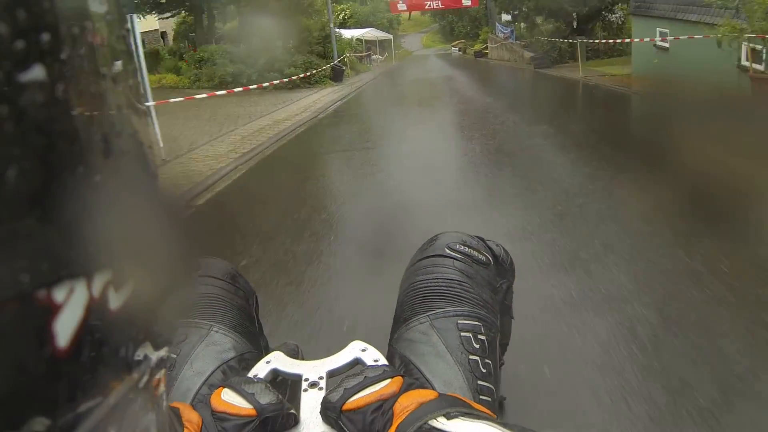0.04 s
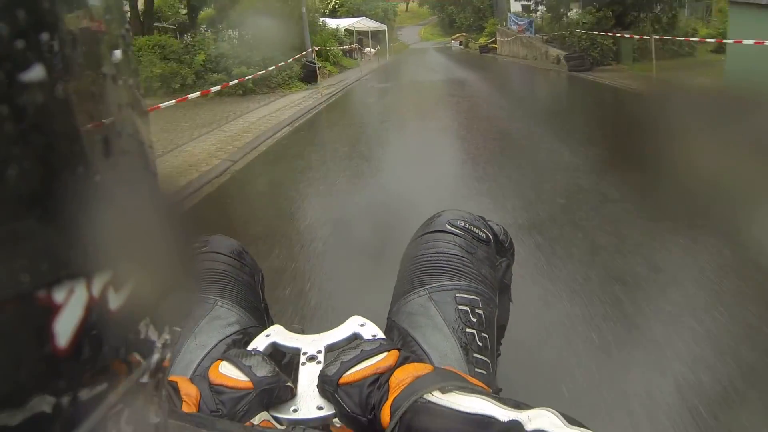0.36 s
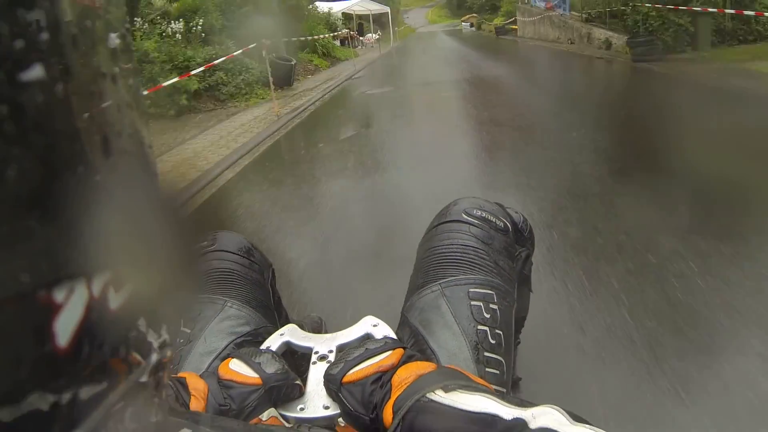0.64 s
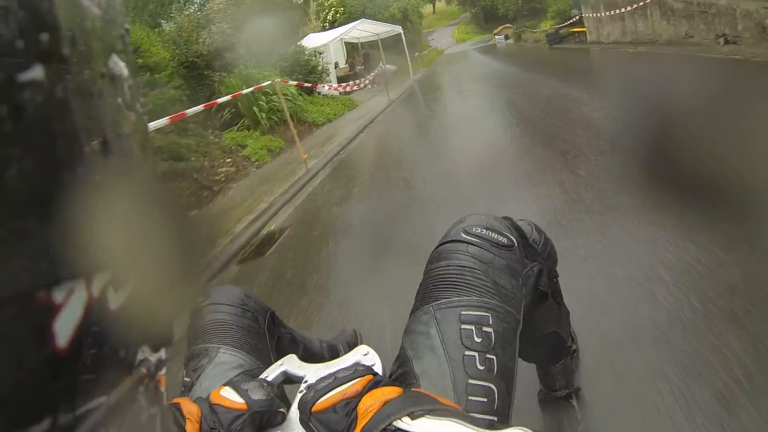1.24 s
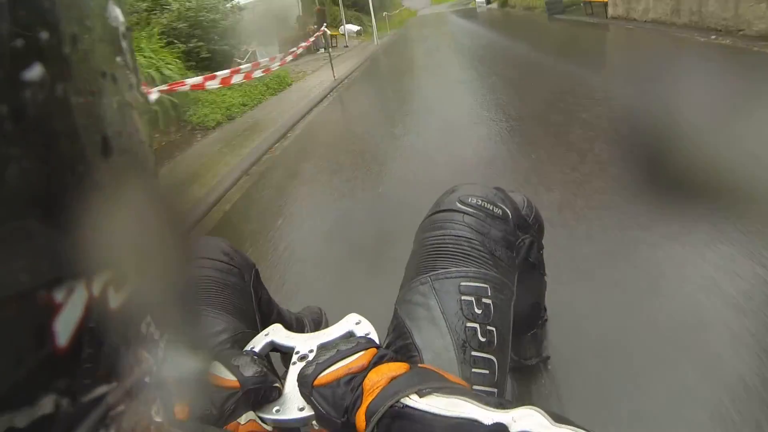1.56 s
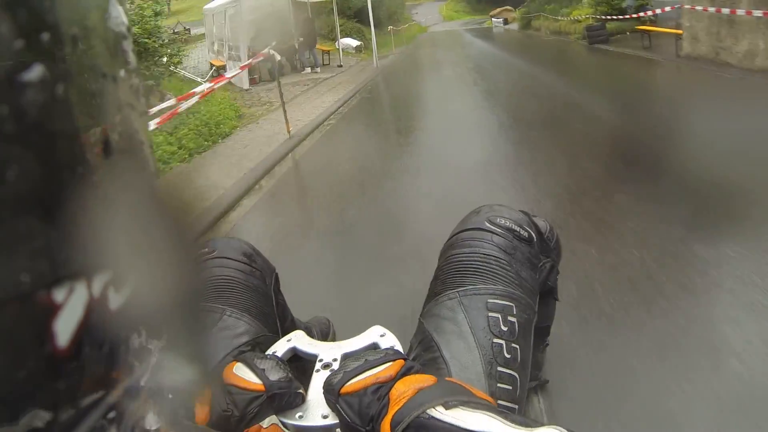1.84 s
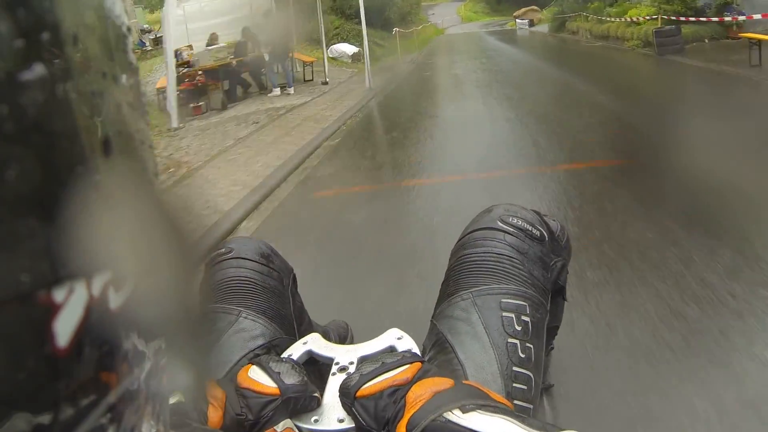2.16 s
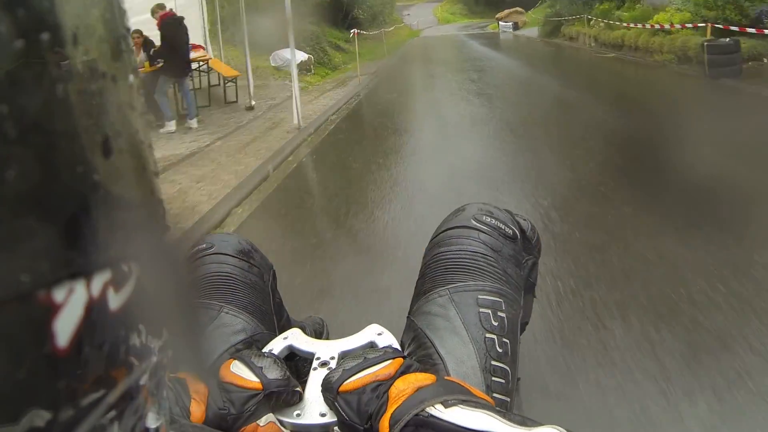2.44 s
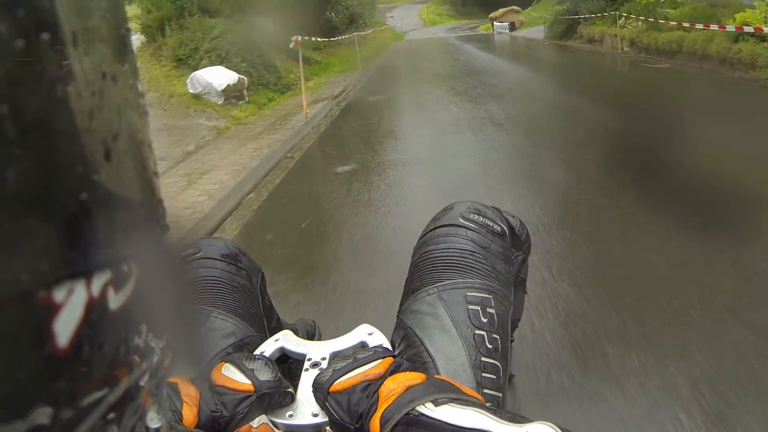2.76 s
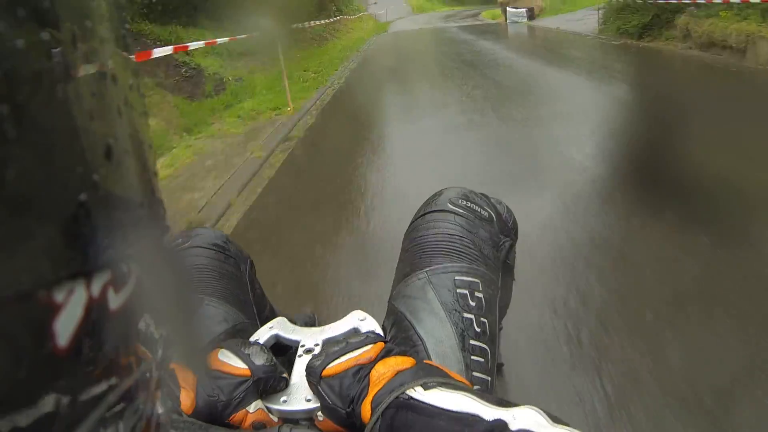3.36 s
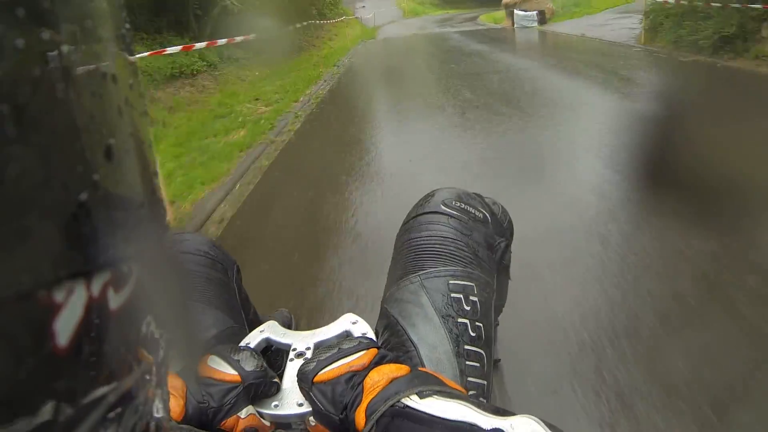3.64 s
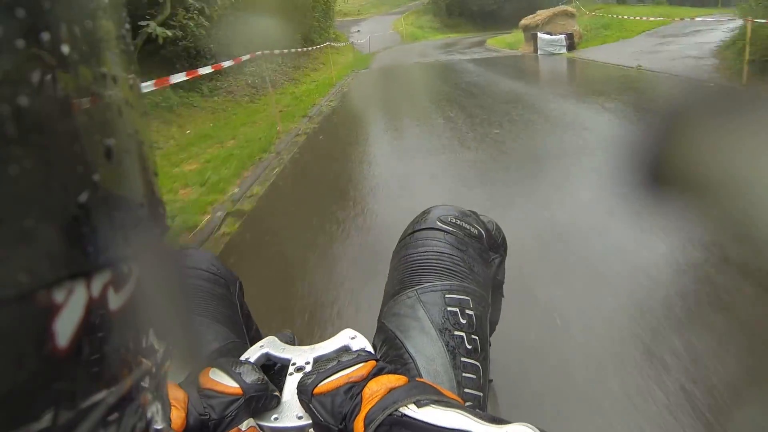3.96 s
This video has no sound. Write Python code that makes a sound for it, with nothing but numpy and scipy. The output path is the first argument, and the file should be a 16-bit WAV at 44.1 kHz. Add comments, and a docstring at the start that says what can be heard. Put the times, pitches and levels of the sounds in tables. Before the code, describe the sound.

A small ride-on car rolls on wet asphalt with a continuous wheel rumble and low shudder, heard from on board. The shudder is steady until about 1 second, weakens, then returns unevenly near 2 seconds, with faint hissing spray. Grit knocks, drops tick and a loose fitting rattles throughout, with one sharper knock around 1.6 seconds. Short gusts hit at 1.2, 3.2 and 3.5 seconds, as the rolling eases slightly.

```python
"""A low shudder and the roar of hard wheels: a small ride-on car coasts down a wet asphalt road.
We listen from a camera fixed to the car. The shudder is the frame bouncing, steadily at first,
then stumbling. The wheels also rumble through the body and throw up a hissing spray.
Grit knocks and water drops tick on the camera housing, a loose fitting rattles,
and three short gusts buffet the microphone."""
import sys
import numpy as np
from scipy import signal
from scipy.fft import rfft, irfft
from scipy.io import wavfile

SR = 44100
rng = np.random.default_rng(int(sys.argv[2]) if len(sys.argv) > 2 else 0)


def master_out(mix):
    """Clip the mix to full scale and print it as 16-bit PCM to the path in sys.argv[1]."""
    frames = np.transpose(np.atleast_2d(mix))
    ceiling = np.clip(frames, -1, 1)
    pcm = np.round(ceiling * 32767).astype(np.int16)
    wavfile.write(sys.argv[1], SR, pcm)


N = 176400
T = np.arange(N) / SR
AGE = T[:4096]  # seconds since a short sound began

# how loudly the wheels roll on the asphalt: t/s, level/dB
ROLLING_LEVEL = [(0.0, -35), (0.79, -36.5), (3.35, -37.5), (3.6, -41.3)]


def from_db(db):
    """Turn decibels into a number to multiply a sound by."""
    return 10 ** (np.asarray(db) / 20)


def rms_one(x):
    """Scale a signal so its average strength (rms) is 1."""
    return x / np.sqrt(np.mean(x ** 2) + 1e-20)


def in_time(rows):
    """Join (time, value) rows by straight lines."""
    return np.interp(T, *np.transpose(rows))


def drift(rate_hz):
    """A smooth random wobble of size about 1; a higher rate wobbles faster."""
    step, warm_up = 40, 2000
    memory = np.exp(-2 * np.pi * rate_hz * step / SR)
    noise = rng.standard_normal(N // step + warm_up + 2)
    slow = signal.lfilter([1], [1, -2 * memory, memory * memory], noise)[warm_up:]
    return np.interp(np.arange(N) / step, np.arange(len(slow)), rms_one(slow))


def coloured(x, colour, resonances=()):
    """Shape the lows and highs by (Hz, dB) points and add ringing peaks; the result has rms 1."""
    hz = np.maximum(np.fft.rfftfreq(N, 1 / SR), 1)
    points_hz, points_db = np.transpose(colour)
    db = np.interp(np.log(hz), np.log(points_hz), points_db)
    for centre, width, gain in resonances:
        db = db + gain / (1 + (2 * (hz - centre) / width) ** 2)
    low_cut = 1 / np.sqrt(1 + (points_hz[0] / hz / 2 ** .5) ** 8)
    high_cut = 1 / np.sqrt(1 + (hz / points_hz[-1] / 2) ** 8)
    return rms_one(irfft(rfft(x) * from_db(db) * low_cut * high_cut, N))


def dying(t60):
    """A fade that starts at 1 and falls by 60 dB in t60 seconds."""
    return np.exp(-np.log(1000) * AGE / t60)


def ring(modes):
    """The fading tones (Hz, dB, t60) of a struck object, a little different on each blow."""
    return sum(from_db(db + rng.normal(0, 0.19)) * np.sin(2 * np.pi * hz * AGE) * dying(t60)
               for hz, db, t60 in modes)


def burst(noise, db, t60):
    """A short piece of noise that fades away."""
    start = rng.integers(N - len(AGE))
    return from_db(db) * noise[start:start + len(AGE)] * dying(t60)


def add(out, s, sound):
    """Mix a sound in at s seconds."""
    i = max(int(s * SR), 0)
    out[i:i + len(sound)] += sound[:max(N - i, 0)]


def wheels():
    """Hard wheels shake the body, roar on the asphalt and throw up a grainy spray."""
    # tone of the road rumble: f/Hz, level/dB
    rumble_colour = [(25, 21.5), (44, 26.5), (65, 2), (160, -7), (300, -12.5), (900, -36)]
    # where the car body rings: f/Hz, width/Hz, boost/dB
    body_peaks = [(89, 1.5, 15.3), (142.4, 28, 6.1), (220, 58, 10.1)]
    # tone of the roar: f/Hz, level/dB
    roar_colour = [(300, -3), (500, 1.5), (740, -7), (1000, 0), (1450, 2), (2800, -9), (3700, -10.5),
                   (5500, -28), (6400, -21), (7500, -38)]
    # where the camera housing rings: f/Hz, width/Hz, boost/dB
    housing_peaks = [(968, 50, 6.2), (1130, 105, 4.5), (1436, 57, 7.4), (5030, 370, 9.7)]
    # loudness of the spray off the tyres: t/s, level/dB
    spray_level = [(0.0, -80), (1.97, -63.5), (4.0, -73)]
    # tone of the spray: f/Hz, level/dB
    spray_colour = [(2500, -30), (6500, -2.5), (8000, -0.5), (9700, 4), (15000, -17)]
    white = rng.standard_normal((3, N))
    rolling_db = in_time(ROLLING_LEVEL)
    rumble_db = -24.5 + 1.7 * (rolling_db - rolling_db.mean()) + 0.5 * drift(17)
    rumble = from_db(rumble_db) * coloured(white[0], rumble_colour, body_peaks)
    roar = from_db(rolling_db + 1.2 * drift(37)) * coloured(white[1], roar_colour, housing_peaks)
    grain = from_db(2.5 * drift(260))
    spray = from_db(in_time(spray_level)) * coloured(white[2] * grain, spray_colour)
    return rumble + roar + spray


def wind():
    """Gusts hit the microphone as short, low puffs of noise."""
    # the peak of each gust: t/s, level/dB
    gusts = [(1.188, -26), (3.203, -20.5), (3.497, -22)]
    width_s = 0.012
    swell = sum(from_db(db) * np.exp(-.5 * ((T - s) / width_s) ** 2) for s, db in gusts)
    return swell * coloured(rng.standard_normal(N), [(65, 0), (140, -14), (900, -38)])


def drops():
    """Water thrown up by the wheels ticks on the housing; finer drops land at random."""
    # the bigger drops: t/s, relative level/dB
    big_drops = [(0.0717, -37), (0.1332, -28.5), (0.5217, -38.5), (0.6777, -35), (0.946, -38),
                 (1.1598, -39), (1.544, -32.5), (2.3175, -39), (2.866, -40.5), (3.1228, -34.5),
                 (3.476, -42.5)]
    # tone of a splash: f/Hz, level/dB
    splash_colour = [(3000, 9.5), (12500, 1), (15500, -18)]
    fine_per_s, fade_s = 24, 0.01
    out = np.zeros(N)
    splash = coloured(rng.standard_normal(N), splash_colour)
    for s, db in big_drops:
        add(out, s, burst(splash, db - 0.5, fade_s))
    for s in T[rng.random(N) < fine_per_s / SR]:
        fine_db = -48 + 3.5 * min(rng.normal(), 2)
        add(out, s, burst(splash, fine_db, fade_s))
    return out


def rattles():
    """A loose fitting taps and scrapes, with faint chatter that is louder when the wheels are."""
    # taps of the fitting: t/s, relative level/dB, f/Hz
    taps = [(.248, -20, 1920), (.2956, -22, 1960), (.34, -29, 1660), (.372, -24.5, 1820),
            (.4685, -16.5, 1994), (.6247, -27.5, 1860), (.865, -22, 1970), (.8715, -19, 1510),
            (.886, -19, 1950), (1.6443, -26.5, 2060), (1.705, -28, 1680), (1.916, -23, 1800),
            (2.475, -24, 1760), (2.6163, -25, 1880), (2.891, -26, 1740), (3.112, -21.5, 1640),
            (3.36, -28, 1660), (3.7999, -26.5, 2430), (3.9468, -21, 1860)]
    # higher tones in every tap: f/Hz, relative level/dB, fade time/s
    upper_tones = [(3060, -8, 0.017), (6250, -23, 0.012)]
    chatter_per_s, rise_s, fade_s = 12, 0.00091, 0.019
    out = np.zeros(N)
    rolling_db = in_time(ROLLING_LEVEL)
    chatter_db = -32.5 + rolling_db - rolling_db.mean()
    scrape = coloured(rng.standard_normal(N), [(1100, -6), (1900, 1), (2600, -23)])
    moments = np.flatnonzero(rng.random(N) < chatter_per_s / SR)
    chatter = [(T[i], chatter_db[i], rng.uniform(1230, 2238)) for i in moments]
    onset = 1 - np.exp(-(AGE / rise_s) ** 2)
    for s, db, hz in list(taps) + chatter:
        tones = ring([(hz, 0, fade_s)] + list(upper_tones))
        contact = tones + burst(scrape, db=-8.5, t60=2 * fade_s)
        add(out, s, from_db(db + 6.5) * contact * onset)
    return out


def grit():
    """Grit strikes the housing with a sharp tick and a hollow knock; a few bits also clink on metal."""
    # the strikes: t/s, relative knock level/dB, knock f/Hz, relative tick level/dB
    strikes = [(0.107, -15, 1970, -31), (0.1744, -15.5, 1600, -37.5), (0.2837, -17, 1630, -30),
               (0.7053, -12.5, 1560, -26), (0.741, -11.5, 1260, -24), (1.1133, -15, 1700, -24.5),
               (1.1213, -8, 2430, -33), (1.184, -13.5, 1620, -43), (1.4809, -18, 2380, -32),
               (1.5669, -3, 1473, -79), (2.1637, -13, 1560, -23), (2.2032, -21.5, 1520, -27.5),
               (2.6416, -12.5, 1640, -27), (2.7232, -18, 1600, -42), (2.9454, -11, 1525, -34),
               (3.9754, -20, 1495, -32.5)]
    # tones in a knock: multiple of its pitch, relative level/dB, fade time/cycles of its pitch
    knock_tones = [(0.771, -5.5, 31), (0.998, 2, 19.3), (1.38, -6, 15.6), (2.1, -17, 29)]
    # tone of a tick: f/Hz, level/dB
    tick_colour = [(1500, -11.5), (3400, 22), (5200, -3), (6200, 6.5), (7300, -8), (11500, -0.5),
                   (15500, -35)]
    # dry metal clinks: t/s, level/dB, f/Hz
    clinks = [(0.107, -16.5, 4710), (1.4814, -26.5, 4600), (2.1632, -20.5, 6130)]
    rise_s, usual_tick_db = 0.00062, -11
    out = np.zeros(N)
    crack = coloured(rng.standard_normal(N), tick_colour)
    onset = 1 - np.exp(-(AGE / rise_s) ** 2)
    for s, db, hz, tick_db in strikes:
        # a weak tick beside its knock means a softer hit, so the high tones are quieter
        db_per_octave = 0.51 * min(tick_db - db - usual_tick_db, 0)
        knock = ring([(hz * ratio, level + db_per_octave * max(np.log2(ratio), 0), cycles / hz)
                      for ratio, level, cycles in knock_tones])
        add(out, s, from_db(db + 4.5) * knock * onset)
        add(out, s, burst(crack, tick_db + 7.5, t60=0.006))
    for s, db, hz in clinks:
        add(out, s, ring([(hz, db, 0.014)]))
    return out


def bodywork(contacts):
    """The panels ring at many pitches at once, leaving a brief tail on every contact."""
    tail = rng.standard_normal(len(AGE)) * dying(t60=0.035)
    ringing = signal.fftconvolve(contacts, tail / np.linalg.norm(tail))[:N]
    return contacts + from_db(-12) * ringing


def shudder():
    """The frame bounces at its lowest natural pitch, uneven in speed and strength."""
    # overall strength of the bounce: t/s, level/dB
    strength = [(0, -15.5), (.15, -8.5), (.9, -9), (1.1, -18), (1.75, -19.5), (1.95, -11), (2.4, -9.5),
                (3, -13.5), (4, -14)]
    # pitch of the bounce: t/s, f/Hz
    pitch = [(0, 38.27), (1.9, 35.31), (2.6, 31.16), (4, 32.04)]
    # a steady drone at first, then it stumbles: t/s, unevenness from 0 to 1
    stumbling = [(.9, .3), (1.3, 1)]
    # brief surges and stalls: t/s, level change/dB, half-width/s
    surges = [(.46, -6.5, 0.043), (1.25, -33, 0.034), (1.393, 10, 0.042), (1.822, -16.5, 0.021),
              (2.69, -13, 0.061), (3.23, 7.5, 0.052), (3.517, 9.5, 0.025), (3.728, -15.5, 0.02)]
    uneven = in_time(stumbling)
    hz = in_time(pitch) * (1 + .075 * uneven * drift(16.0))
    surge_db = sum(db * np.exp(-.5 * ((T - s) / width) ** 2) for s, db, width in surges)
    dip_db = 3.5 * uneven * np.minimum(drift(11.76), .5)  # capped, so it dips more than it rises
    level = from_db(in_time(strength) + surge_db + dip_db)
    return level * np.sqrt(2) * np.sin(2 * np.pi * np.cumsum(hz) / SR)


def scene():
    """All the sounds meet at one microphone."""
    ride = shudder() + wind() + wheels()
    contacts = grit() + drops() + rattles()
    return (ride + bodywork(contacts))[None]


def record(dry):
    """Flatten the loudest peaks and cut the very highest treble."""
    stop_hz = 16952
    treble_cut = signal.cheby2(12, 70, stop_hz, fs=SR, output="sos")
    return signal.sosfilt(treble_cut, np.clip(dry, -.95, .95))


dry = scene()
out = record(dry)
master_out(out)
```